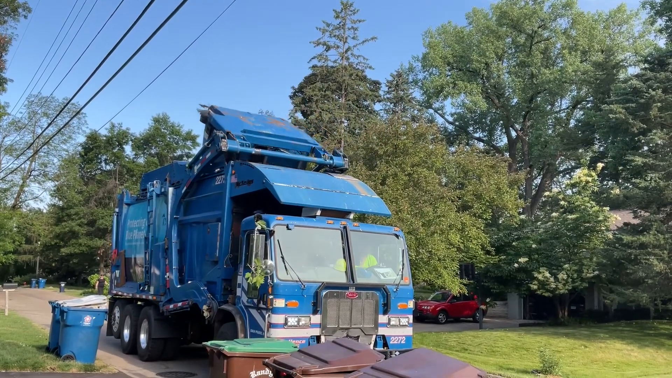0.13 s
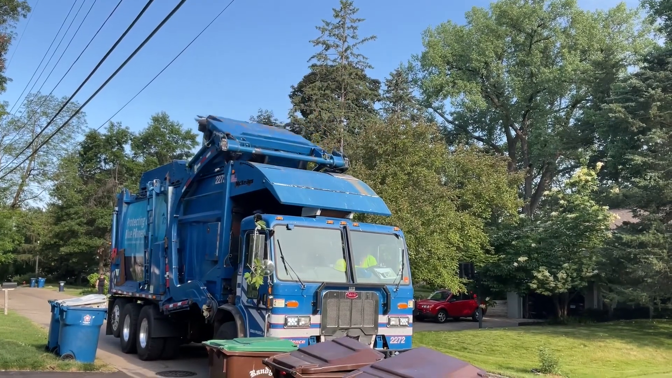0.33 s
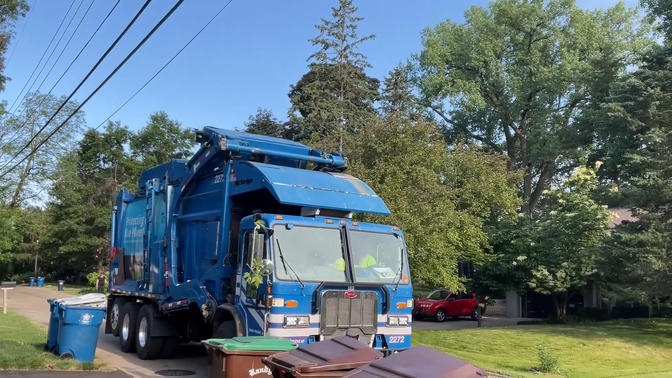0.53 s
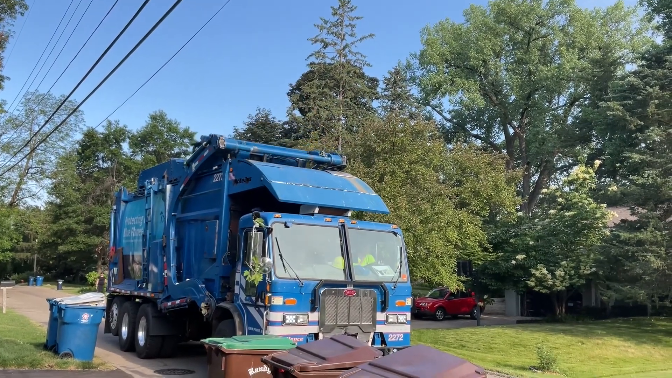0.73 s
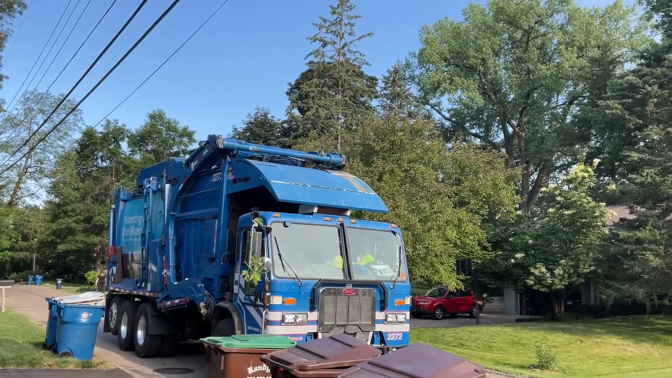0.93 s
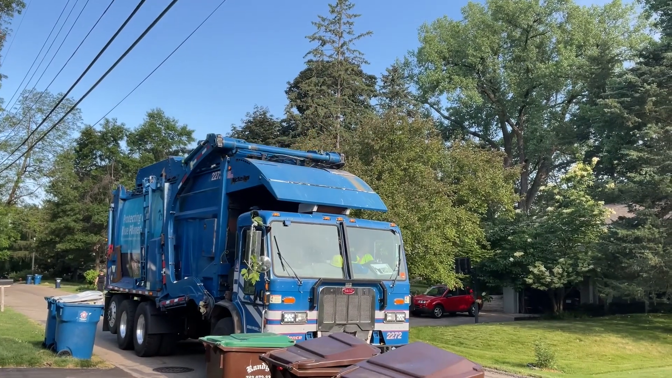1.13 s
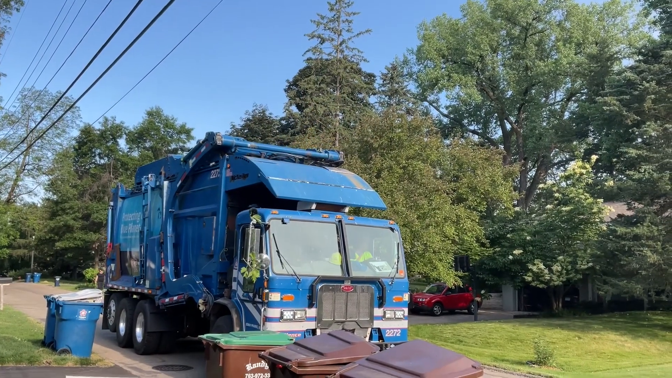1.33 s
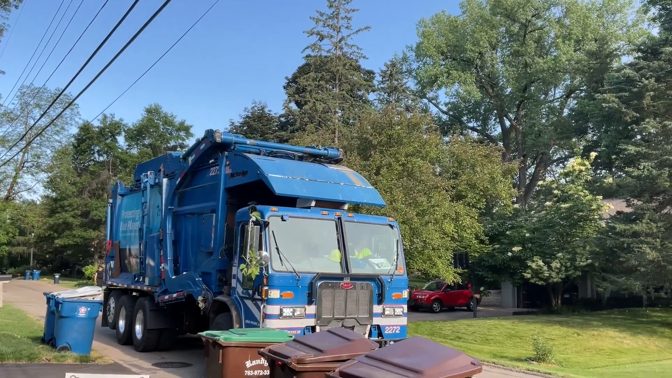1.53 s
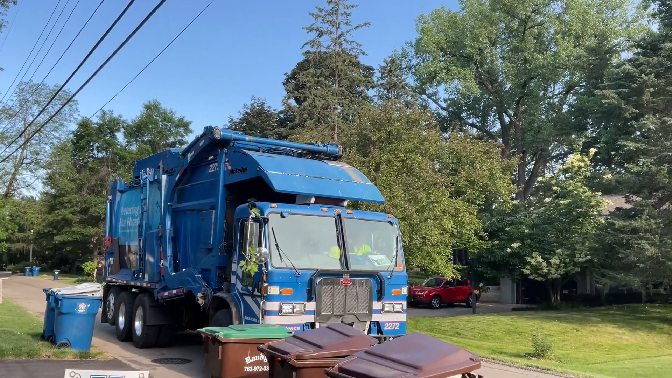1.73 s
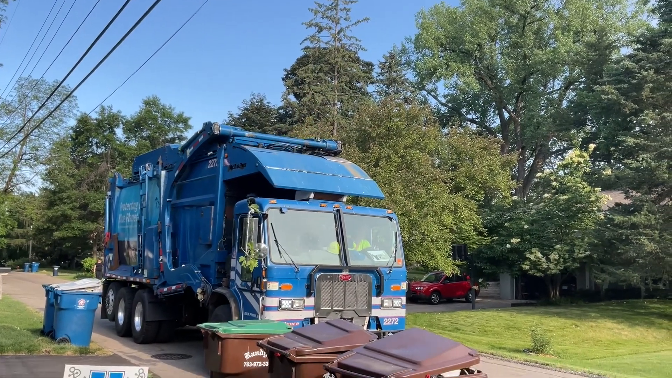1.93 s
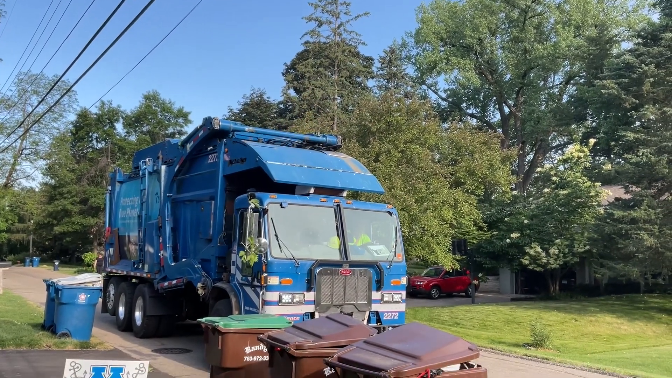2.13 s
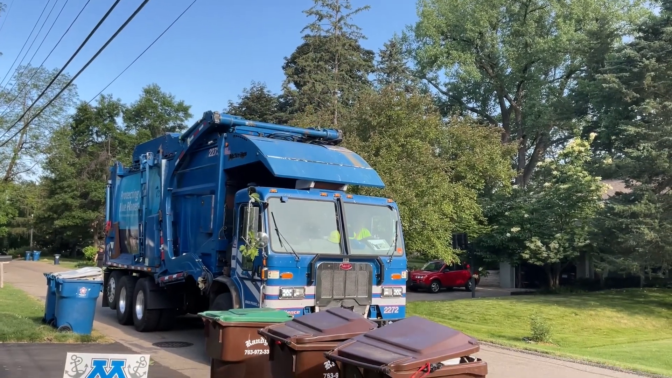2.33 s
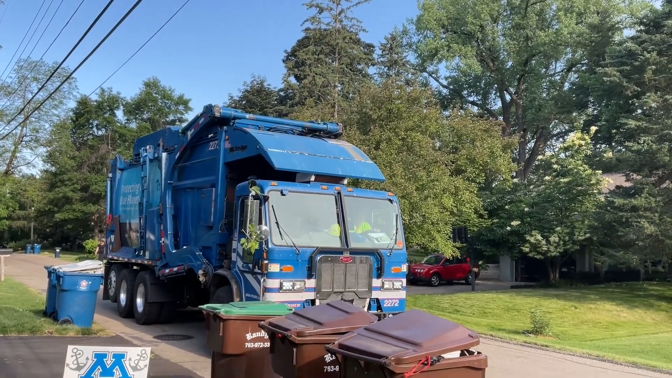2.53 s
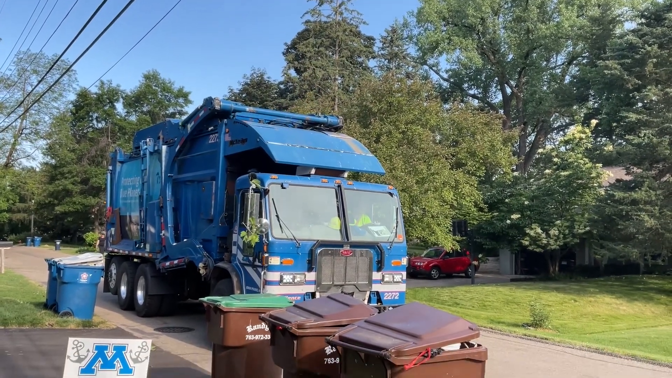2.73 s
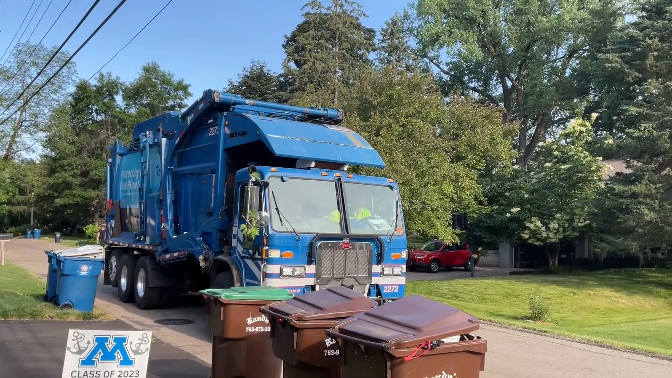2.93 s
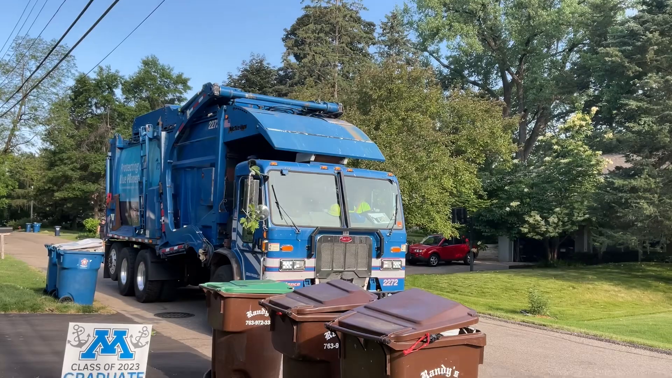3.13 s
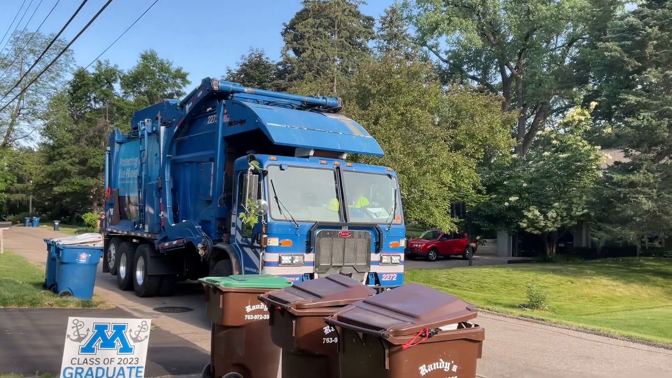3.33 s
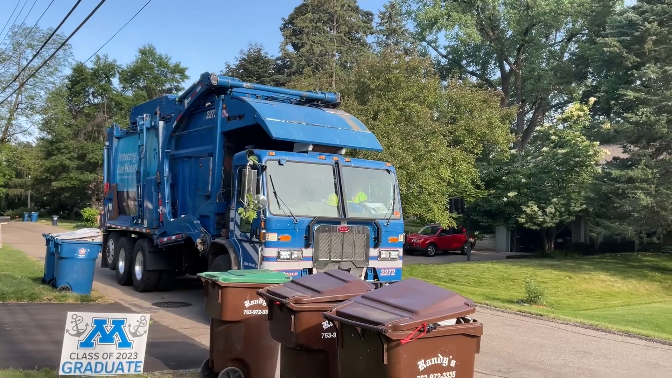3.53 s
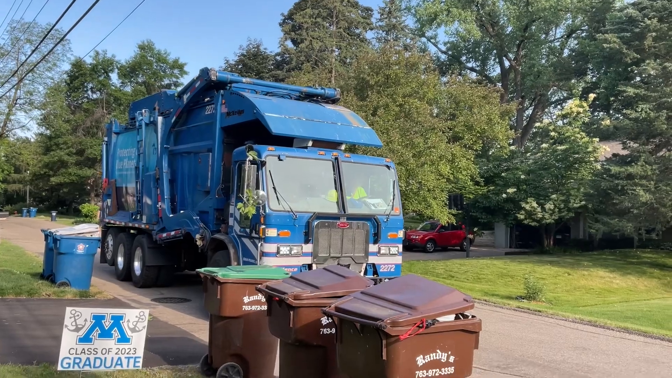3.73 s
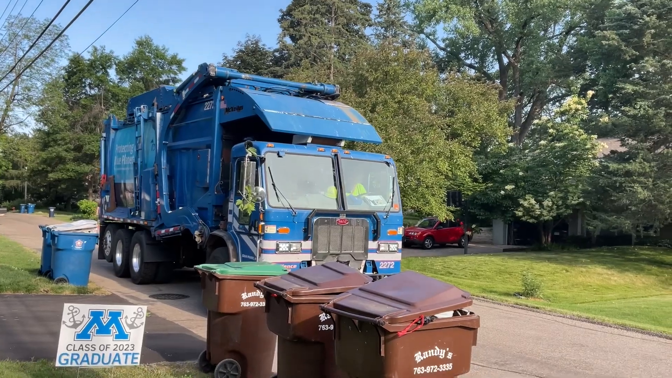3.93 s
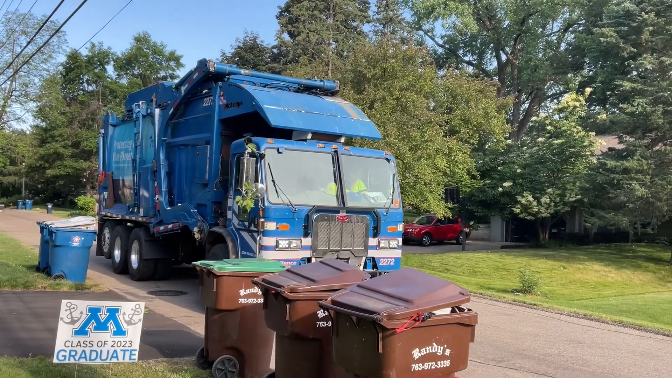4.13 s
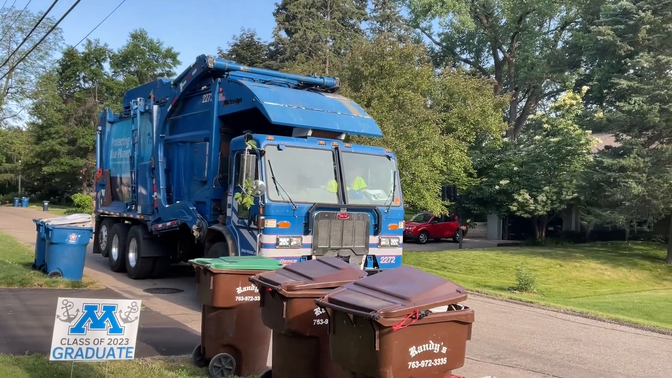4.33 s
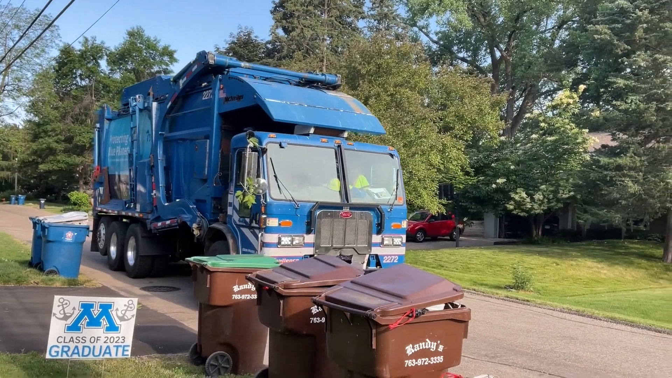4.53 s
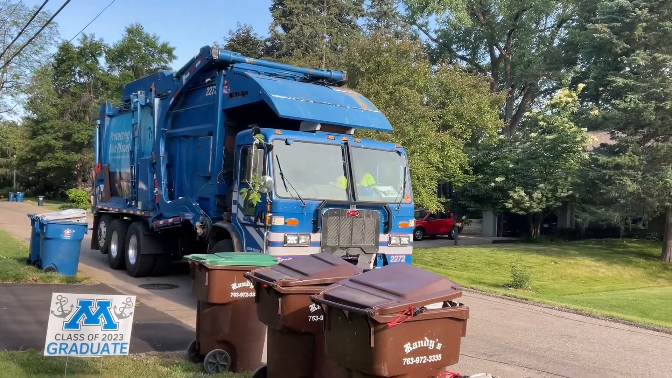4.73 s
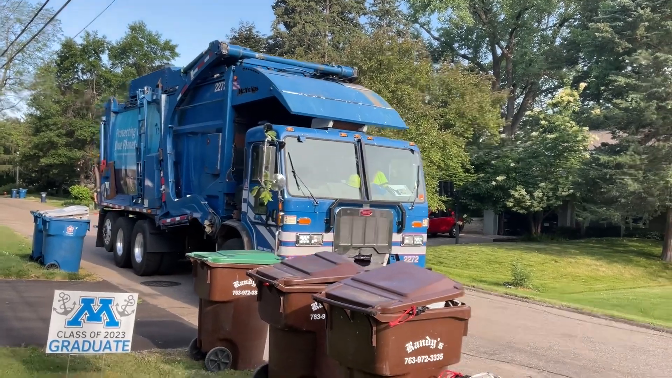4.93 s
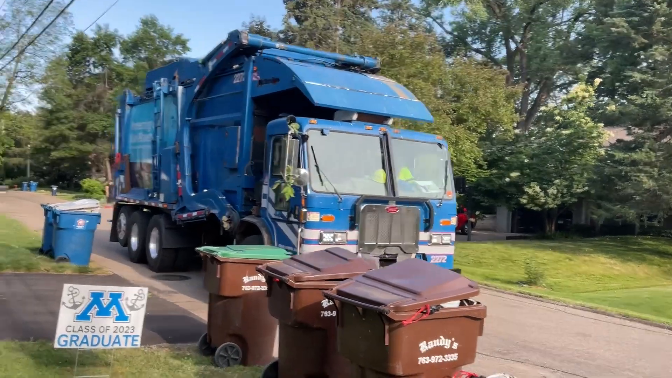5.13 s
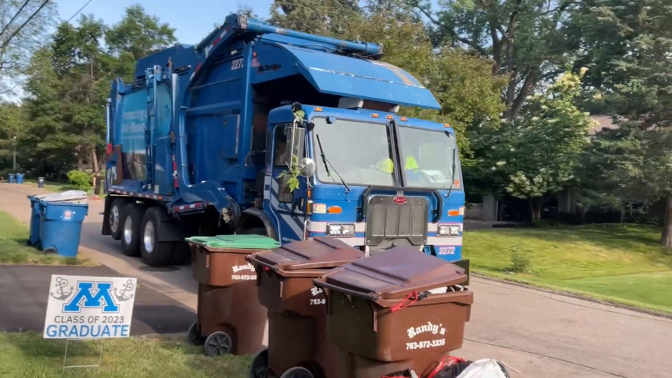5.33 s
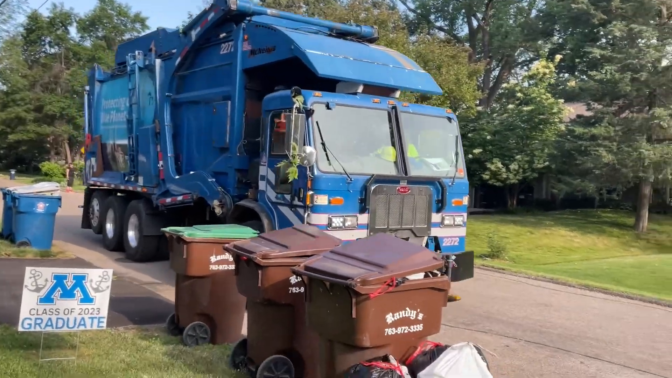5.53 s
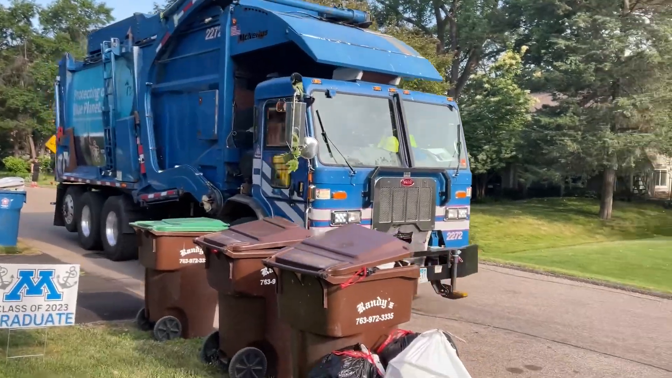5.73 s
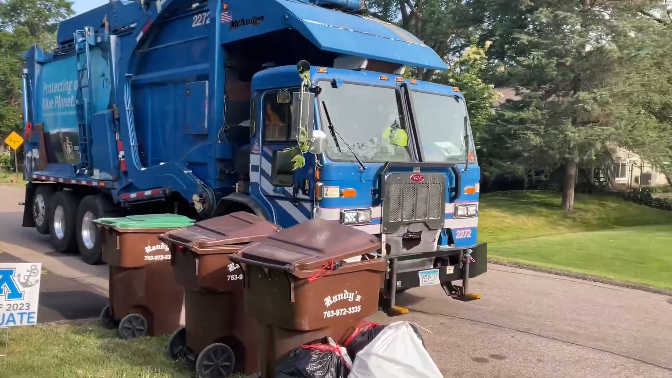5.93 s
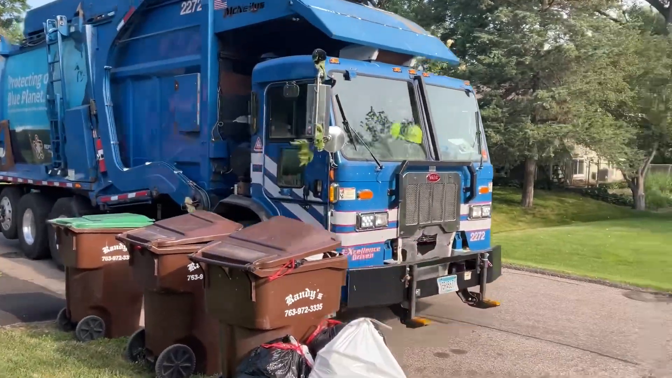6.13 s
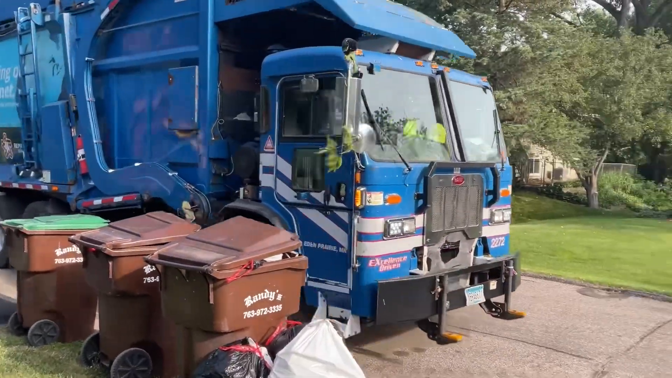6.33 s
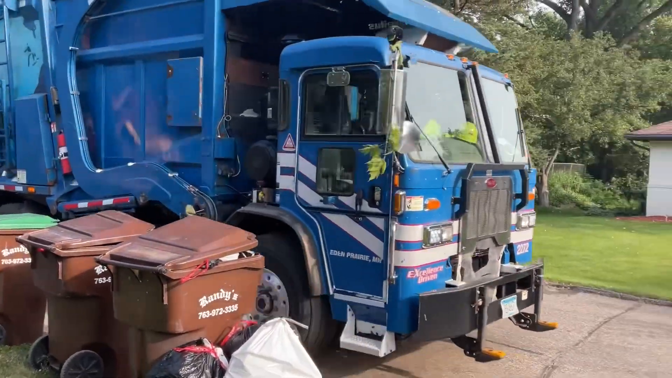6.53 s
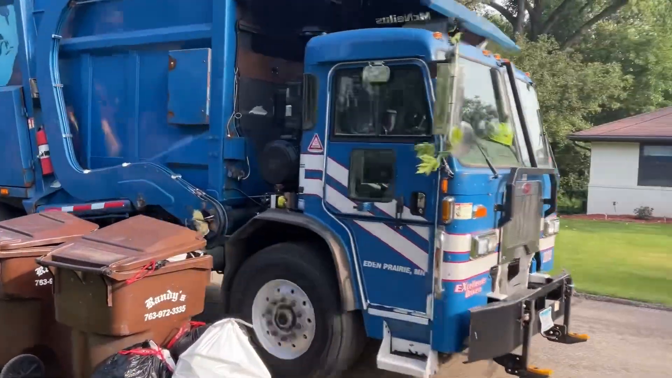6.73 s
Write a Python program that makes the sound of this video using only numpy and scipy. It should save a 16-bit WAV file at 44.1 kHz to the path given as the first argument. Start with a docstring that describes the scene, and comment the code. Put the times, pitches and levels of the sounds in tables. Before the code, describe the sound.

A heavy diesel garbage truck idles roughly 13 metres from a phone at the kerb on a quiet suburban street. From 0 s there is an uneven low chug, metallic clatter and hydraulic whine, with a hollow thud at the start as the lifting arms settle. Pump strokes swell around 1.1, 1.9 and 2.5 s, with faint air spits and a soft thud near 1.2 s. At 3.25 s a bright air brake hiss bursts for about a quarter second, with a rough squawking groan. A deep thump at 3.85 s starts the pull-away; revs climb with a straining drone. Two clipped buzzing horn toots hit at 4.86 and 5.07 s, echoing off houses. The roar and thin turbo whistle peak near 5.7 s as the truck nears, then pitch falls steadily to about 6.6 s, with small sharp spits, a low rumble and a thin gear whine ending close by.

```python
"""A six-cylinder diesel garbage truck clatters at idle 13 m down a quiet street while its pump lowers the arms.
Cylinder firings pulse the exhaust and knock the block; sines on the crank speed make gear and pump whines.
The air brake lets go as filtered noise, its shoes groan as gliding tones, and two buzzing horn toots ring the
flare. The engine revs and its bay grows louder as the truck rolls towards a phone at the kerb; at the end
the engine speed falls. House echoes, a scattered street tail and left-right differences make it wide."""
import sys
import numpy as np
from scipy import signal
from scipy.fft import rfft, irfft, next_fast_len
from scipy.io import wavfile
from scipy.ndimage import uniform_filter1d

SR = 44100
rng = np.random.default_rng(int(sys.argv[2]) if len(sys.argv) > 2 else 0)


def materialize(psi):
    """Save the field psi as 16-bit PCM at rate SR to the path in sys.argv[1].

    A 1-D psi becomes a single channel; in a 2-D psi each row is a channel.
    """
    bounded = np.clip(np.atleast_2d(psi).T, -1, 1)
    quanta = np.round(bounded * 32767).astype(np.int16)
    wavfile.write(sys.argv[1], SR, quanta)


N = 302967
IDLE_HZ = 41  # reference firing rate for levels that follow the speed


def undb(db):
    """Decibels to gain."""
    return 10 ** (np.asarray(db) / 20)


def seconds():
    """The time of every sample."""
    return np.arange(N) / SR


def curves(rows):
    """The columns of a table, joined by straight lines in time."""
    s, *columns = np.transpose(rows)
    return [np.interp(seconds(), s, column) for column in columns]


def unit(x):
    """Scale to rms 1."""
    return x / np.sqrt(np.mean(x ** 2))


def noise():
    """White noise, rms near 1."""
    return rng.standard_normal(N)


def walk(rate):
    """Random levels held 1 / rate s and slewed twice; spread near 1."""
    hold = int(SR / rate)
    steps = np.repeat(rng.standard_normal(N // hold + 1), hold)
    return 1.3 * uniform_filter1d(uniform_filter1d(steps, hold), hold)[:N]


def gate(s, length, attack, release):
    """Rise from s, stay up until length has passed, then die away."""
    age = seconds() - s
    return np.clip(age / attack, 0, 1) * np.exp(-np.maximum(age - length, 0) / release)


def over_bins(points, size):
    """A (Hz, value) table on the bins of a transform, straight on a log axis."""
    hz, value = np.transpose(points)
    bin_hz = np.arange(size // 2 + 1) * SR / size
    return np.interp(np.log(bin_hz + 1), np.log(hz), value)


def colour(x, points, size=8192):
    """Causal minimum-phase filter with the given spectrum, already ringing at the start; rms 1."""
    cepstrum = irfft(np.log(undb(over_bins(points, size))))
    cepstrum[1:size // 2] *= 2  # fold the cepstrum to make the filter causal
    cepstrum[size // 2 + 1:] = 0
    response = irfft(np.exp(rfft(cepstrum)))
    padded = np.pad(x, (size - 1, 0), "reflect")
    return unit(signal.fftconvolve(padded, response, "valid"))


def ring(x, hz, width_hz):
    """One resonance, gain 1 at its centre."""
    return signal.lfilter(*signal.iirpeak(hz, hz / width_hz, fs=SR), x)


def band_noise(hz, width_hz):
    """Noise passed twice through one resonance; rms 1."""
    return unit(ring(ring(noise(), hz, width_hz), hz, width_hz))


def sine(hz):
    """A pure tone on a moving pitch; rms 1."""
    return np.sqrt(2) * np.sin(2 * np.pi * np.cumsum(hz) / SR)


def tone(hz, orders):
    """Sines on multiples of a moving pitch; rms 1."""
    angle = 2 * np.pi * np.cumsum(hz) / SR
    return unit(sum(undb(db) * np.sin(k * angle + rng.uniform(0, 2 * np.pi)) for k, db in orders))


# Crank speed, at idle and then revving. Each row: time in seconds, firings a second in Hz.
IDLE_CRANK = [(0.0, 40.66), (0.98, 40.33), (1.35, 42.66), (1.75, 40.74), (2.15, 41.94), (2.8, 39.95),
              (3.2, 41.66), (3.6, 40.7), (3.83, 43.94)]
REV_CRANK = [(4.08, 54), (4.27, 60.73), (4.45, 67.02), (5.42, 90.87), (5.75, 99.76), (5.95, 95.53),
             (6.42, 71.63), (6.5, 68.2), (6.62, 66.3)]
# Blend of the engine's tone. Each row: time in seconds, roar from 0 (idle clatter) to 1 (full roar).
TONE_BLEND = [(0, 0.06), (3.7, 0.58), (4.3, 0.64), (5.3, 0.94)]
# The cylinders in firing order. Each row: exhaust strength in dB, knock strength in dB.
CYLINDERS = [(-4.5, -1), (2, 4), (0, -1.5), (2, -2), (1.5, 3), (1.2, -7)]


def crank():
    """Speed adds up to a count of firings, and each firing has its own cylinder's strength."""
    hz = curves(np.concatenate([IDLE_CRANK, REV_CRANK]))[0]
    roar = curves(TONE_BLEND)[0]
    firings = np.cumsum(hz) / SR
    puff, knock = undb(CYLINDERS)[firings.astype(int) % len(CYLINDERS)].T
    return hz, roar, firings, puff, knock


# Spectrum of the exhaust pipe. Each row: frequency in Hz, level in dB.
PIPE_SPECTRUM = [(20, -89), (40, -18), (58, 4), (78, 12.5), (98, 1.5), (120, -20), (165, -24), (220, -23),
                 (330, -34.5), (600, -52), (1500, -93), (5000, -140)]
# How strongly the exhaust puffs. Each row: time in seconds, level in dB.
EXHAUST_LEVEL = [(0, -17), (1, -17.5), (1.5, -19.5), (2.5, -19.5), (3.65, -19), (3.85, -22.5), (4.9, -20.5),
                 (5.57, -20.5), (5.85, -13), (6.06, -20), (6.2, -15), (6.36, -23), (6.52, -23.5),
                 (6.63, -33.5)]


def exhaust(firings, strength):
    """One pulse a firing; the pipe booms on the second harmonic at idle, on the first when revving."""
    scatter = undb(.8 * noise())
    pulses = np.diff(np.floor(firings), prepend=-1) * strength * scatter
    return colour(pulses, PIPE_SPECTRUM) * undb(curves(EXHAUST_LEVEL)[0])


START_M, ROLLS_S, ACCEL_M_S2 = 13.1, 3.84, 1.49


def nearness_db():
    """Level gained as the truck accelerates from its waiting distance towards the phone."""
    rolling = np.maximum(seconds() - ROLLS_S, 0)
    distance_m = np.maximum(START_M - .5 * ACCEL_M_S2 * rolling ** 2, 2)
    return 20 * np.log10(START_M / distance_m)


def cycle_noise(firings, repeat, size=3000):
    """Rattle of which a share comes back on every engine cycle, so that its lines glide with the speed."""
    pattern = rng.standard_normal(size)
    cycle = firings / len(CYLINDERS) % 1
    again = unit(np.interp(cycle * size, np.arange(size), pattern))
    return np.sqrt(repeat) * again + np.sqrt(1 - repeat) * noise()


# Gear meshes and the housing resonance each sweeps through. Each row: teeth a firing, centre in Hz,
# width in Hz, level in dB against the clatter.
GEAR_MESHES = [(14.34, 590, 160, -11.5), (14.2, 936.6, 300, -15.5), (23.2, 1740, 520, -13),
               (43.4, 1772, 90, -8), (43.4, 3880, 500, -17), (58.8, 3900, 180, -15)]


def gears(hz, flutter_db=2):
    """Gears whine when their tooth rate passes a housing resonance; backlash blurs the pitch."""
    out = 0
    for teeth, centre_hz, width_hz, db in GEAR_MESHES:
        backlash = 1 + .011 * hz / IDLE_HZ * walk(350) + .003 * walk(15)
        response = 1 / (1 + (2 * (hz * teeth - centre_hz) / width_hz) ** 2)
        out = out + sine(hz * teeth * backlash) * response * undb(db + flutter_db * walk(25))
    return out


# Thin whines, several of them pump overtones. Each row: multiple of the firing rate,
# level in dB against the clatter.
WHINE_ORDERS = [(5.35, -15), (8.16, -22), (10.68, -18.5), (12.24, -19), (16.32, -22)]


def whine(hz, flutter_db=2.0):
    """Thin whines on multiples of the firing rate, several of them pump overtones, glide with it."""
    out = 0
    for k, db in WHINE_ORDERS:
        out = out + sine(k * hz * (1 + .003 * walk(30))) * undb(db + flutter_db * walk(9))
    return out


# Uneven orders of the crank. Each row: multiple of the firing rate, level in dB.
GROWL_ORDERS = [(1 / 2, -12), (4 / 3, -2), (3 / 2, 0), (5 / 3, -8), (2, -6), (7 / 3, -2), (3, -8),
                (10 / 3, -2), (9 / 2, -5), (16 / 3, -3), (6, -8)]


def growl(firings, flutter_db=3.5):
    """Unequal cylinders add lines between the firing harmonics."""
    out = 0
    for k, db in GROWL_ORDERS:
        turns = k * (firings + 0.03 * walk(40)) + rng.random()
        out = out + undb(db + flutter_db * walk(12)) * np.sin(2 * np.pi * turns)
    return unit(out)


# Spectra of the block's knock and of its treble, idling and roaring. Each row: frequency in Hz, level in dB.
IDLE_BODY_SPECTRUM = [(40, -26), (110, 7), (240, 1), (420, 0), (580, -4.5), (780, -5.5), (1100, -3),
                      (1400, -13), (1780, -6.5), (2100, -13), (2800, -6), (4200, -40), (8000, -52)]
ROAR_BODY_SPECTRUM = [(40, -22), (135, 6.5), (185, -0.5), (250, 2.5), (370, -1), (460, 1.5), (600, 0.5),
                      (750, -4), (1050, -2), (1350, -8), (1750, -0.5), (2500, -9.5), (3300, -23),
                      (4500, -32), (8000, -59)]
IDLE_HISS_SPECTRUM = [(1500, -22.5), (2600, 3), (3200, 0.5), (4000, -0.5), (4700, -3), (5100, -7.5),
                      (5800, -4.5), (6400, -5.5), (7500, -8), (9600, -7.5), (11500, -23), (15500, -35)]
ROAR_HISS_SPECTRUM = [(1500, -26), (2900, 3), (3400, -1), (3900, -0.5), (4500, -4.5), (5100, -8),
                      (5800, -8.5), (6400, -8), (8000, -12), (10000, -14), (11500, -20.5), (15500, -27)]
CLATTER_DB, CLATTER_DB_PER_OCTAVE = -37.5, 8.5  # level at the idle reference, rise with speed
HISS_DB, HISS_DB_PER_OCTAVE = -48.5, 11.5
HISS_NEARNESS = 1.29  # how fast the treble opens up as the truck nears; 1 = as distance alone
# oil and linkage add to the bay until the arms rest
ARMS_REST_S, ARMS_FADE_S, ARMS_CLATTER_DB, ARMS_HISS_DB = 0.58, 0.5, 1.5, 3
# the clatter swells for a moment at high revs; the length includes the attack
SURGE_S, SURGE_LENGTH_S, SURGE_ATTACK_S, SURGE_RELEASE_S, SURGE_DB = 5.01, 0.71, 0.47, 0.15, 2.5
GROWL_DB, GROWL_OFF_S, GROWL_RELEASE_S = -6.5, 6.276, .2  # dB against the clatter at full roar
IDLE_REPEAT, ROAR_REPEAT = .33, .17  # share of rattle that repeats each cycle, at no roar and full roar
KNOCK_BLEND = .7  # share of the knock that evens out at full roar


def engine_bay(hz, firings, strength, roar, knock=0.66, tick=0.54, decay=1.0):
    """Firings knock the block and tick the valves, louder with speed; gears, whines and growl join in."""
    octaves, near_db = np.log2(hz / IDLE_HZ), nearness_db()
    # gates that start before zero are already open at the first sample
    arms = gate(-1.13, 1.13 + ARMS_REST_S, .5, ARMS_FADE_S)
    surge = gate(SURGE_S, SURGE_LENGTH_S, SURGE_ATTACK_S, SURGE_RELEASE_S)
    body_db = CLATTER_DB + CLATTER_DB_PER_OCTAVE * octaves + near_db
    body_db += ARMS_CLATTER_DB * arms + SURGE_DB * surge
    hiss_db = HISS_DB + HISS_DB_PER_OCTAVE * octaves + HISS_NEARNESS * near_db + ARMS_HISS_DB * arms

    scatter = undb(2.4 * rng.standard_normal(1000))[firings.astype(int)]
    since_firing = (firings + 0.036 * walk(60)) % 1  # loose parts strike a little early or late
    blow = strength * scatter * np.exp(-since_firing / decay)
    blow = blow + KNOCK_BLEND * roar ** 2 * (blow.mean() - blow)

    repeat = IDLE_REPEAT + (ROAR_REPEAT - IDLE_REPEAT) * roar ** 2
    rattle = cycle_noise(firings, repeat) * (1 + knock * blow)
    fizz = noise() * (1 + tick * blow) * undb(1.0 * walk(45))
    body = (1 - roar) * colour(rattle, IDLE_BODY_SPECTRUM) + roar * colour(rattle, ROAR_BODY_SPECTRUM)
    hiss = (1 - roar) * colour(fizz, IDLE_HISS_SPECTRUM) + roar * colour(fizz, ROAR_HISS_SPECTRUM)

    mesh = gears(hz) * undb(near_db / 2)  # the side of the engine comes into view
    whines = whine(hz) * (1 - roar)  # they fade as the roar takes over
    growl_gain = roar * gate(-1.024, 1.024 + GROWL_OFF_S, .5, GROWL_RELEASE_S)
    crank_growl = growl(firings) * growl_gain * undb(GROWL_DB)
    return (body + mesh + whines + crank_growl) * undb(body_db) + hiss * undb(hiss_db)


# The pump under pressure. Each row: start in seconds, length in seconds, level in dB,
# overtones in dB on top of the common overtone level.
STROKES = [(1.078, 0.6, -33.5, -2.5), (1.903, 0.42, -33.5, -4), (2.54, 0.92, -35.5, -23),
           (3.727, 0.38, -40.5, -10)]
# Overtones of the pump. Each row: multiple of the pump pitch, level in dB relative to one another.
PUMP_OVERTONES = [(2, -2.5), (3, -13)]
PUMP_RATIO = 4.08  # strokes of the pistons a firing
PUMP_COAST_DB, PUMP_OFF_S, PUMP_OVERTONES_DB = -37.5, 3.6, -10.5


def pump(hz, attack=0.077, release=0.025, off_release=0.015):
    """The crank-driven hydraulic pump hums, and swells with each stroke under pressure."""
    hum = buzz = undb(PUMP_COAST_DB) * gate(-0.96, 0.96 + PUMP_OFF_S, attack, off_release)
    for s, length, db, overtones_db in STROKES:
        stroke = undb(db) * gate(s, length, attack, release)
        hum = hum + stroke
        buzz = buzz + stroke * undb(overtones_db)
    pump_hz = hz * PUMP_RATIO * (1 + 0.00397 * walk(20))
    return sine(pump_hz) * hum + tone(pump_hz, PUMP_OVERTONES) * buzz * undb(PUMP_OVERTONES_DB)


TURBO_PEAK_S, TURBO_SPOOL_S, TURBO_HZ = 5.6, 1.25, 12550  # pitch at the peak
TURBO_DB, TURBO_DB_PER_OCTAVE = -55.5, 14  # level at the peak, slope with spin


def turbo():
    """The turbocharger spools up and runs down once: a thin whistle, louder the faster it spins."""
    spin = 1 / (1 + ((seconds() - TURBO_PEAK_S) / TURBO_SPOOL_S) ** 2)
    whistle = sine(TURBO_HZ * spin * (1 + .007 * walk(900)))
    return whistle * undb(TURBO_DB + TURBO_DB_PER_OCTAVE * np.log2(spin) + 2 * walk(25))


def bursts(rows, attack):
    """Short noises that die away in one resonance."""
    out = 0
    for s, decay, hz, width_hz, db in rows:
        age = np.maximum(seconds() - s, 0)
        envelope = np.minimum(age / attack, 1) * np.exp(-age / decay)
        out = out + band_noise(hz, width_hz) * undb(db) * envelope
    return out


# Thuds of the hollow body, and a last low swell of rumble near 240 Hz. Each row: start in seconds,
# decay in seconds, centre in Hz, width in Hz, level in dB.
THUDS = [(.02, 0.1, 212, 110, -27.5), (1.17, 0.082, 204, 110, -37.5), (3.37, 0.094, 250, 40, -32),
         (3.858, 0.029, 76, 14, -17), (6.65, .16, 240, 90, -33.5)]


def body_thuds():
    """The body thuds as the arms settle and the truck takes up drive; a low rumble swells at the end."""
    return bursts(THUDS, attack=0.015)


# Small spits and squeaks. Each row: start in seconds, decay in seconds, centre in Hz, width in Hz, level in dB.
AIR_SPITS = [(.147, .012, 13200, 1190, -53), (.84, 0.016, 12900, 6060, -51),
             (.999, 0.016, 12900, 6160, -56), (2.028, 0.021, 12410, 6000, -53),
             (3.825, 0.026, 4900, 5000, -40.5), (6.335, 0.051, 11950, 6070, -50),
             (6.5, 0.044, 13000, 3000, -44), (6.665, 0.029, 14940, 401, -45)]


def air_spits():
    """Small spits of air and squeaks: quick bursts of resonant noise."""
    return bursts(AIR_SPITS, attack=.002)


# Spectrum of the escaping air. Each row: frequency in Hz, level in dB.
VALVE_SPECTRUM = [(300, -24), (900, -16), (1400, -17), (1800, -14), (2200, -8), (2600, 0), (3400, -8),
                  (4200, -4), (5100, -7.5), (6600, -1.5), (8500, -4), (10200, -4.5), (11800, -12),
                  (14500, -8.5)]
# Ringing of the valve in the first rush. Each row: centre in Hz, width in Hz, level in dB against the hiss.
VALVE_RESONANCES = [(4120, 420, -7.5), (6600, 560, -5)]
AIR_S, AIR_OPEN_S, AIR_ATTACK_S, AIR_CLOSE_S = 3.256, 0.2, 0.02, .078
AIR_DB, AIR_SAG_DB_PER_S = -19.5, 35.5
VALVE_RING_S, SPUTTER_DB = 0.04, 1.3


def air_brake():
    """Air sputters from the valve, which rings at first; both weaken as the pressure falls."""
    age = np.maximum(seconds() - AIR_S, 0)
    pressure = undb(AIR_DB - AIR_SAG_DB_PER_S * age + 0.38 * walk(140))
    flow = gate(AIR_S, AIR_OPEN_S, AIR_ATTACK_S, AIR_CLOSE_S) * pressure
    rings = 0
    for hz, width_hz, db in VALVE_RESONANCES:
        rings = rings + band_noise(hz, width_hz) * undb(db + 2 * SPUTTER_DB * walk(70))
    hiss = colour(noise(), VALVE_SPECTRUM) * undb(SPUTTER_DB * walk(110))
    return (hiss + rings * np.exp(-age / VALVE_RING_S)) * flow


# Brake shoes rubbing as they let go, and in the last row a thin steady gear whine near 944 Hz. Each row:
# start in seconds, length in seconds, pitch in Hz, glide in Hz per second, level in dB, overtones in dB.
GROANS_AND_WHINE = [(3.318, 0.046, 620, -850, -27.5, 0), (3.327, 0.029, 605, -2200, -25, -8),
                    (3.377, 0.068, 519, -2, -32.5, -15), (3.42, 0.025, 1240, -2600, -39.5, -20),
                    (3.715, 0.18, 537, 0, -42, -10), (6.753, .1, 944, -3, -32, -26)]
# Overtones of each tone. Each row: multiple of the pitch, level in dB before the tone's own overtone setting.
GROAN_OVERTONES = [(2, 0.5), (3, 0), (4, -1), (5, 3)]


def shoe_groans_and_gear_whine(attack=0.0038, release=0.014, rough_db=3.5):
    """Shoes stick and slip free in rough squawks, then purer groans; a thin gear whine sounds at the end."""
    out = 0
    for s, length, pitch_hz, glide, db, overtones_db in GROANS_AND_WHINE:
        waver = 1 + .035 * undb(overtones_db / 2) * walk(600)
        hz = (pitch_hz + glide * np.clip(seconds() - s, 0, length + release)) * waver
        orders = [(0.99, 0)] + [(k, order_db + overtones_db) for k, order_db in GROAN_OVERTONES]
        level = undb(db + rough_db * walk(200))
        out = out + tone(hz, orders) * gate(s, length, attack, release) * level
    return out


# Drone of the engine taking up the weight. Each row: multiple of the firing rate, level in dB.
DRONE_ORDERS = [(2, -37.5), (3, -39.5), (13 / 3, -43.5), (16 / 3, -44.5)]
LUG_S, LUG_LENGTH_S = 4.053, 0.66


def lugging(hz, attack=0.59, release=.25):
    """While the engine strains to move the truck, multiples of its firing rate drone."""
    drone = 0
    for k, db in DRONE_ORDERS:
        drone = drone + sine(k * hz * (1 + .004 * walk(25))) * undb(db + 2 * walk(10))
    return drone * gate(LUG_S, LUG_LENGTH_S, attack, release)


# Horn toots. Each row: start in seconds, length in seconds, level in dB,
# extra level in dB of the part above the flare's corner.
HORN_TOOTS = [(4.857, 0.056, -14.5, -0.5), (5.066, 0.044, -14.5, 0.5)]
# Spectrum of the horn. Each row: frequency in Hz, level in dB.
HORN_SPECTRUM = [(410, 4.5), (820, -2.8), (1230, -4.3), (1640, -2.8), (2050, -2.3), (2460, -4), (2870, 3.5),
                 (3280, -11), (3700, -18), (4100, -21), (4510, -21), (5340, -24), (5750, -19), (6160, -18),
                 (6570, -14.5), (6980, -20), (7800, -28), (9000, -25), (9850, -29), (10400, -23),
                 (11090, -26), (11500, -33), (12300, -30), (15500, -39)]
# House fronts that answer the horn. Each row: delay in seconds, level in dB, centre in Hz, width in Hz.
HOUSE_ECHOES = [(0.022, -11, 12030, 5010), (0.033, -7.5, 820.6, 895), (.104, -6, 1600, 397)]
HORN_BEND, HORN_SETTLE_S = .01, .008  # share by which the horn starts sharp, and its settling time


def horn(pitch_hz=409.0, attack=0.0061, release=0.0082, corner_hz=1900, bright_attack=0.011,
         bright_release=0.0036):
    """A buzzing diaphragm starts sharp and brightens; its flare rings on and house fronts throw it back."""
    t = seconds()
    highpass = signal.butter(2, corner_hz, "highpass", fs=SR, output="sos")
    harmonics = [(k, 0) for k in np.arange(1, 38)]
    toots = 0
    for s, length, db, bright_db in HORN_TOOTS:
        bend = 1 + HORN_BEND * np.exp(-np.maximum(t - s, 0) / HORN_SETTLE_S) + .0012 * walk(300)
        buzz = colour(tone(pitch_hz * bend, harmonics), HORN_SPECTRUM)
        top = signal.sosfiltfilt(highpass, buzz)
        bright = undb(bright_db) * gate(s, length, bright_attack, bright_release)
        toots = toots + undb(db) * ((buzz - top) * gate(s, length, attack, release) + top * bright)
    flare = undb(-7) * ring(toots, 815, 10) + undb(-9) * ring(toots, 2050, 14)
    echoes = 0
    for delay, db, hz, width_hz in HOUSE_ECHOES:
        echoes = echoes + undb(db) * np.interp(t - delay, t, ring(toots, hz, width_hz), left=0)
    return toots + flare + echoes


def street(x, t60, wet_db, band_hz):
    """Trees, bins and houses scatter a short tail of decaying, band-limited noise."""
    t = np.arange(SR) / SR
    tail = rng.standard_normal(SR) * np.exp(-np.log(1000) * t / t60)
    tail = tail / np.sqrt(np.sum(tail ** 2))
    tail = signal.sosfilt(signal.butter(2, band_hz, "bandpass", fs=SR, output="sos"), tail)
    return undb(wet_db) * signal.fftconvolve(x, tail)[:N]


# Phase between the channels. Each row: frequency in Hz, radians by which left leads.
LEFT_LEAD = [(100, -.15), (450, .35), (1250, .1), (1420, -1), (1700, .3), (2150, 1.8), (2330, 2.5),
             (2430, 3.11), (2780, 3.16), (2950, 3.6), (3900, 5.9), (4800, 6.1), (5300, 1.4), (6200, .5),
             (7400, 1.5), (8500, .8), (8900, 2.4), (10000, 0)]
# Balance of the channels. Each row: frequency in Hz, left minus right level in dB.
LEFT_OVER_RIGHT = [(70, -2.5), (200, -4.8), (380, -4.5), (700, -1), (1300, 0), (3200, 0), (7000, 1.5),
                   (10000, 0)]


def widen(x):
    """Left and right differ in phase and level across frequency, which widens the sound."""
    size = 2 * next_fast_len(N // 2 + 4096, real=True)
    # half the difference goes to the left, the inverse half to the right
    left = undb(over_bins(LEFT_OVER_RIGHT, size) / 2) * np.exp(.5j * over_bins(LEFT_LEAD, size))
    return irfft(rfft(x, size) * np.array([left, 1 / left]))[:, :N]


def scene():
    """The crank drives exhaust, bay, lugging and pump; turbo, thuds, air, brake and horn join in."""
    hz, roar, firings, puff, knock = crank()
    engine = exhaust(firings, puff) + engine_bay(hz, firings, knock, roar)
    engine = engine + pump(hz) + turbo() + lugging(hz)
    truck = engine + body_thuds() + air_spits() + air_brake() + shoe_groans_and_gear_whine() + horn()
    centre_tail = street(truck, t60=0.15, wet_db=-11.5, band_hz=[250, 5000])
    # a scattered tail, opposite in left and right, makes the street wide
    wide_tail = street(truck, t60=0.56, wet_db=-14.0, band_hz=[500, 9000])
    wide_tail += street(truck, t60=.35, wet_db=-12, band_hz=[3500, 10000])
    return widen(truck + centre_tail) + np.array([wide_tail, -wide_tail])


def record(dry):
    """The phone cuts the top with a steep low-pass at 15750 Hz."""
    return signal.sosfilt(signal.ellip(10, .2, 80, 15750, fs=SR, output="sos"), dry)


dry = scene()
out = record(dry)
materialize(out)
```